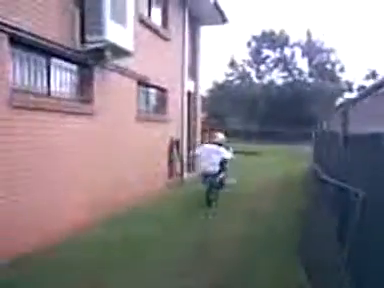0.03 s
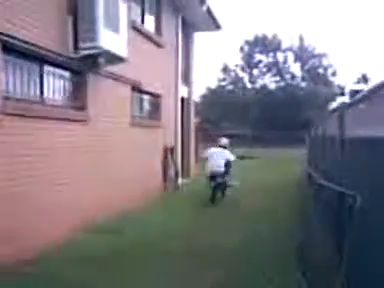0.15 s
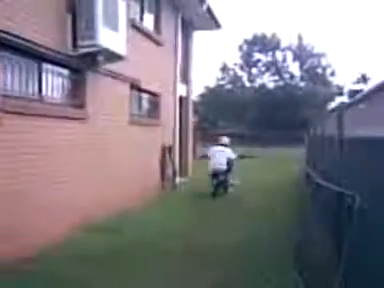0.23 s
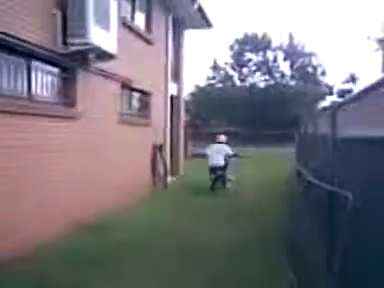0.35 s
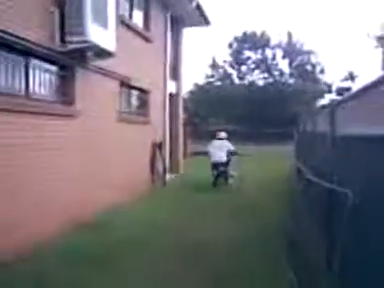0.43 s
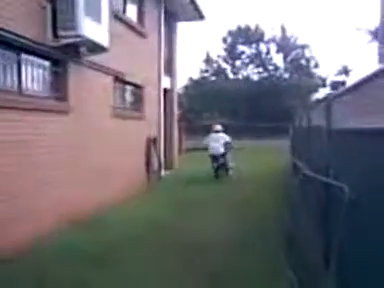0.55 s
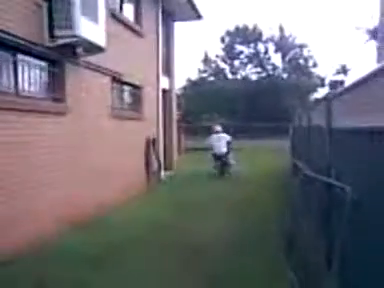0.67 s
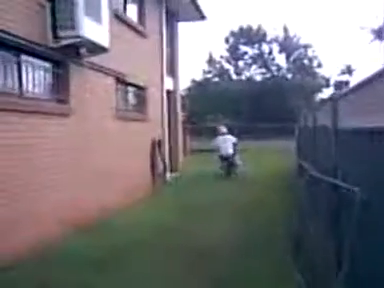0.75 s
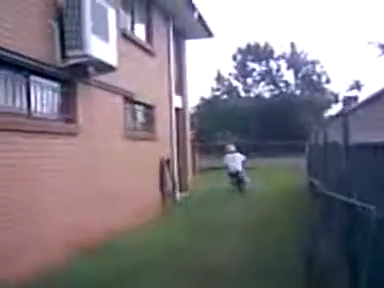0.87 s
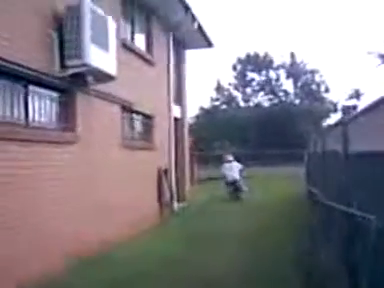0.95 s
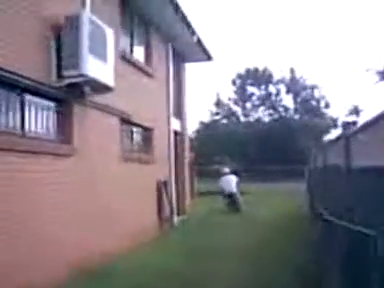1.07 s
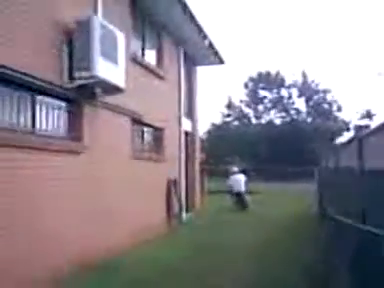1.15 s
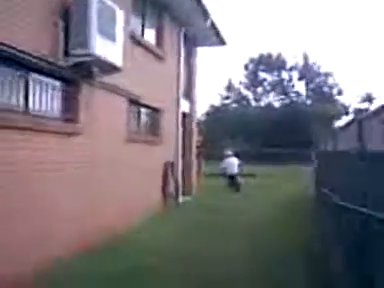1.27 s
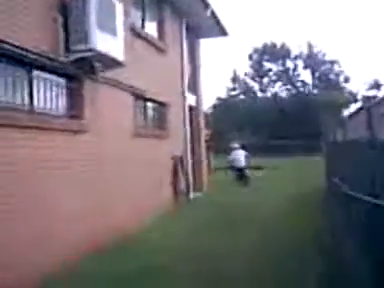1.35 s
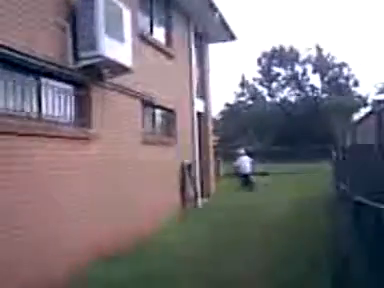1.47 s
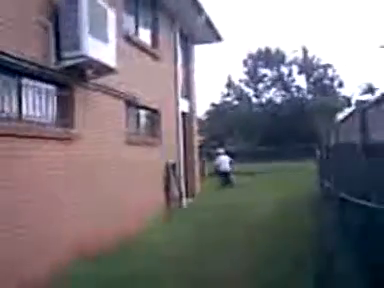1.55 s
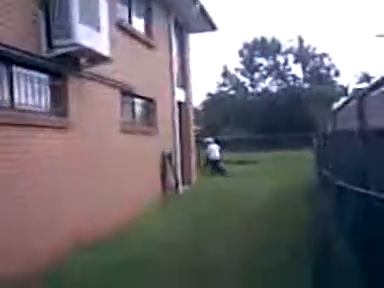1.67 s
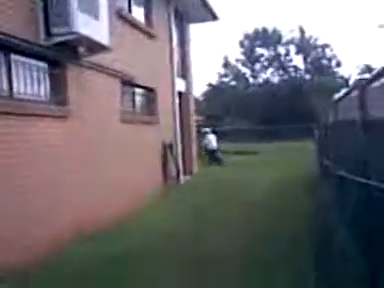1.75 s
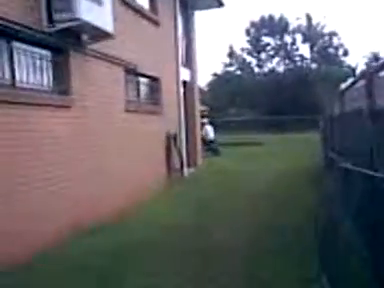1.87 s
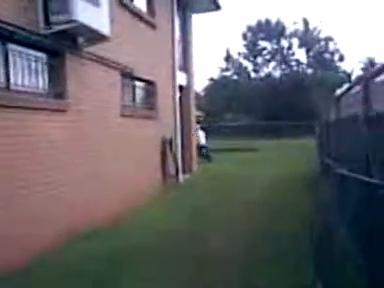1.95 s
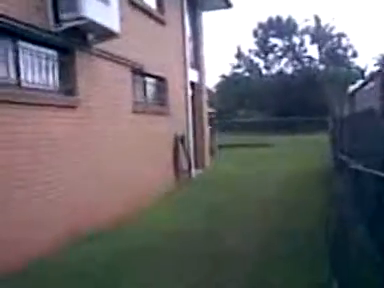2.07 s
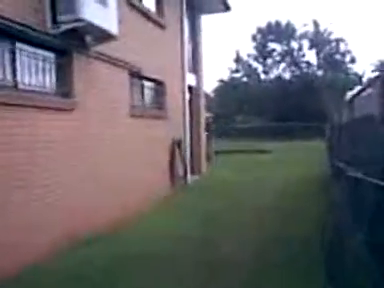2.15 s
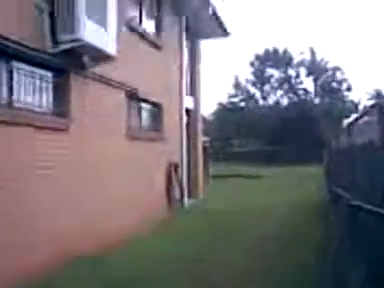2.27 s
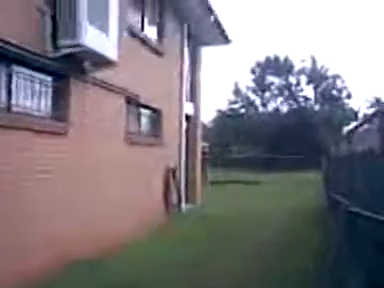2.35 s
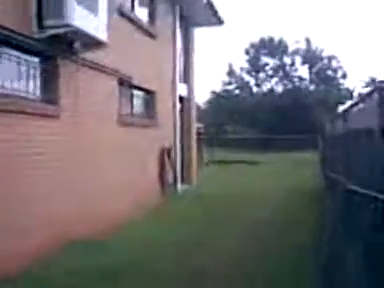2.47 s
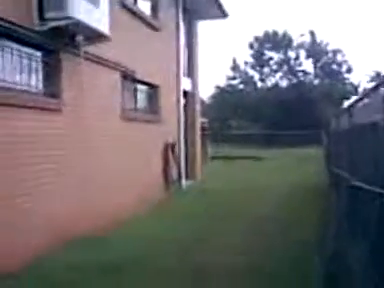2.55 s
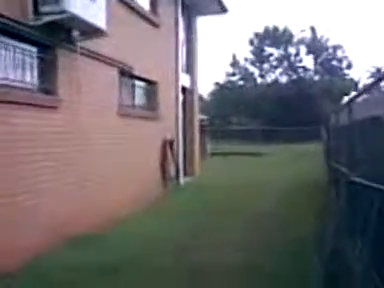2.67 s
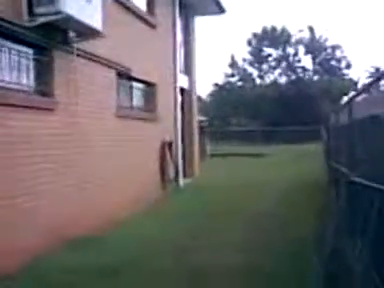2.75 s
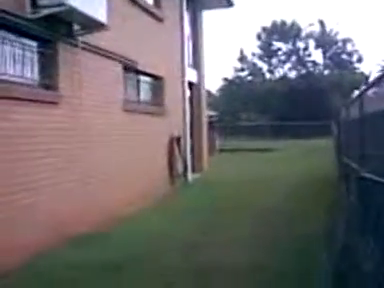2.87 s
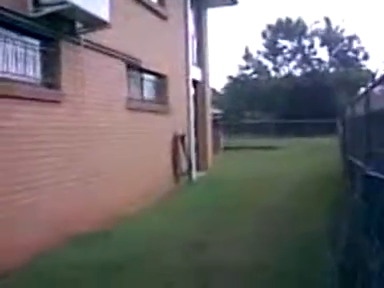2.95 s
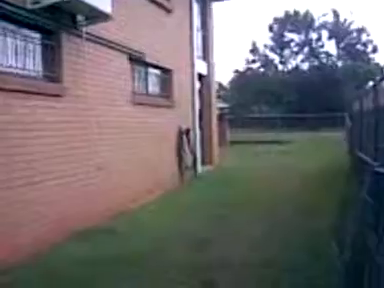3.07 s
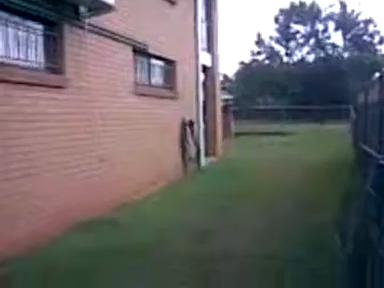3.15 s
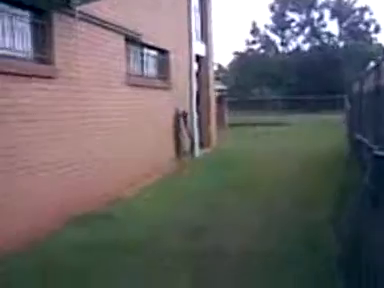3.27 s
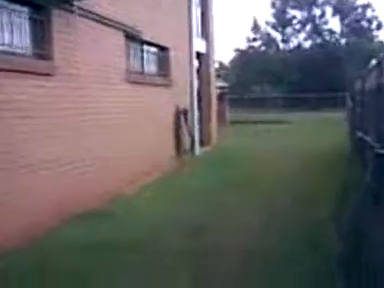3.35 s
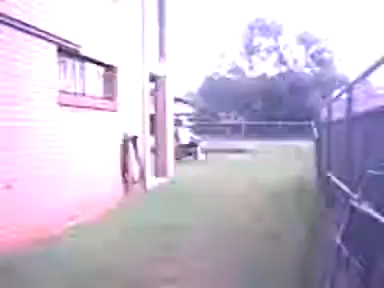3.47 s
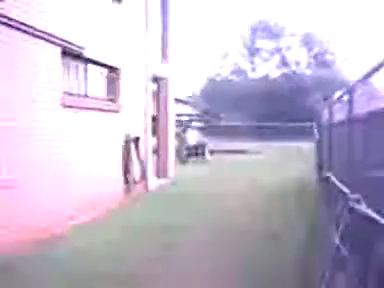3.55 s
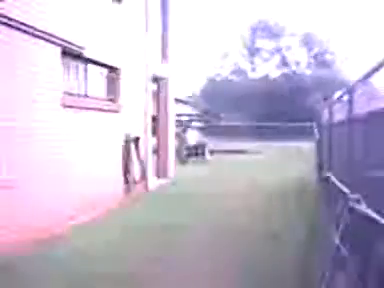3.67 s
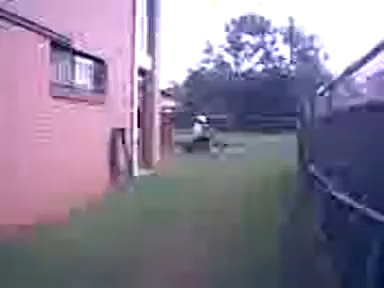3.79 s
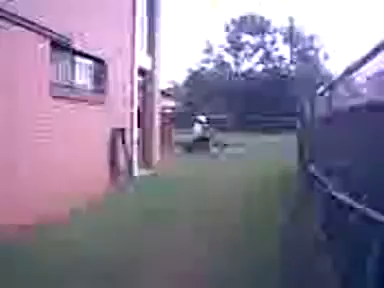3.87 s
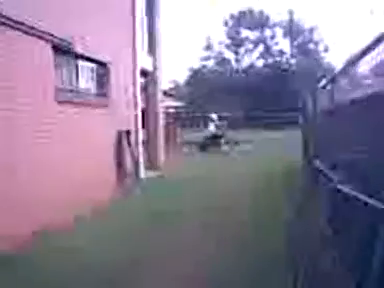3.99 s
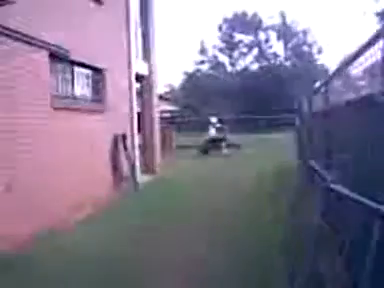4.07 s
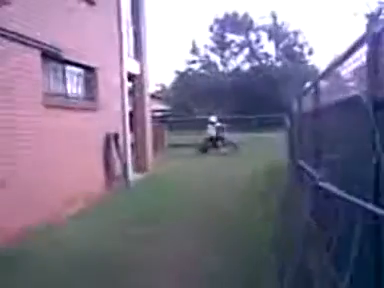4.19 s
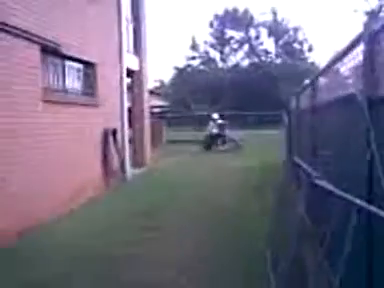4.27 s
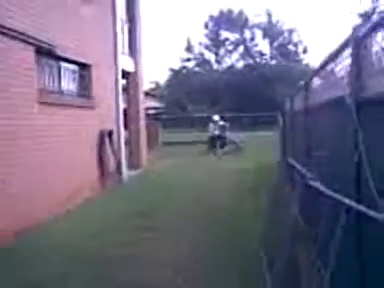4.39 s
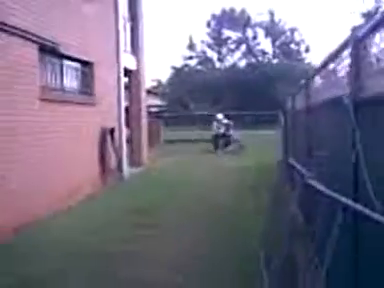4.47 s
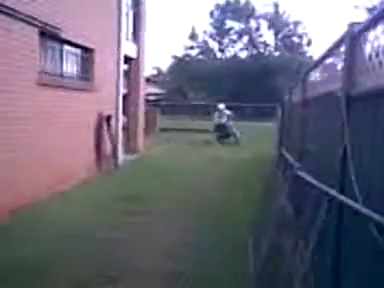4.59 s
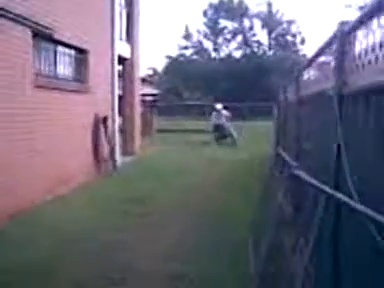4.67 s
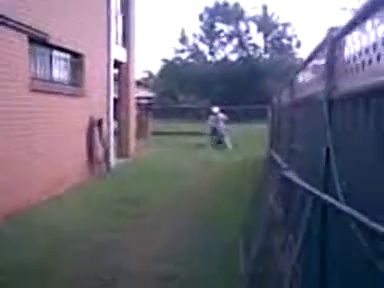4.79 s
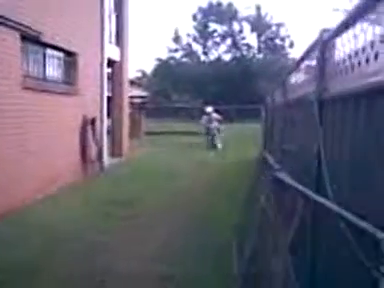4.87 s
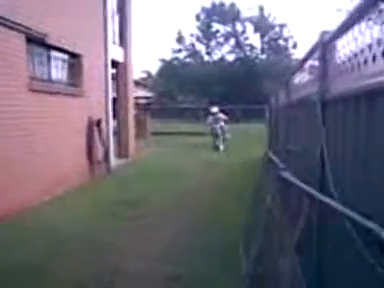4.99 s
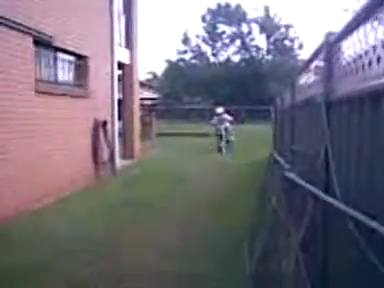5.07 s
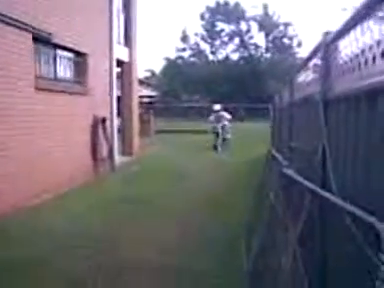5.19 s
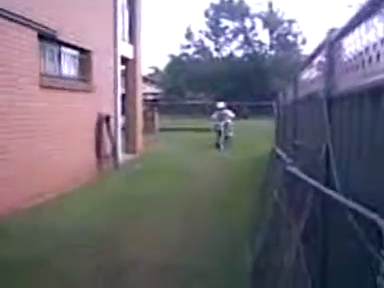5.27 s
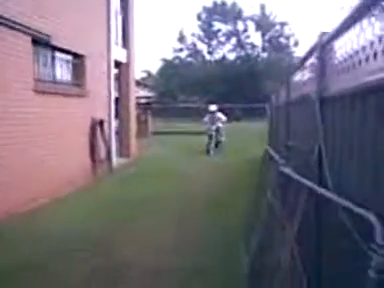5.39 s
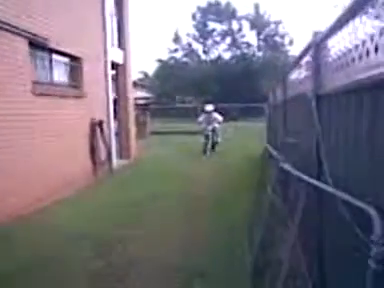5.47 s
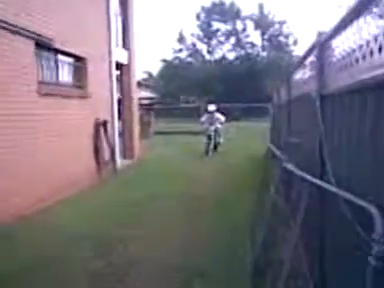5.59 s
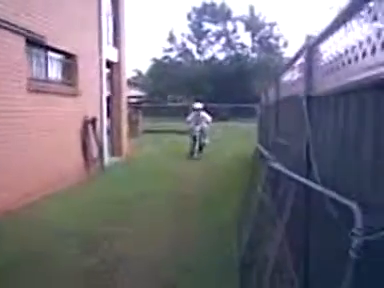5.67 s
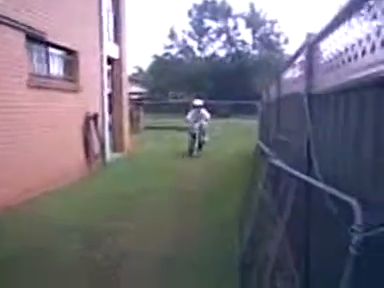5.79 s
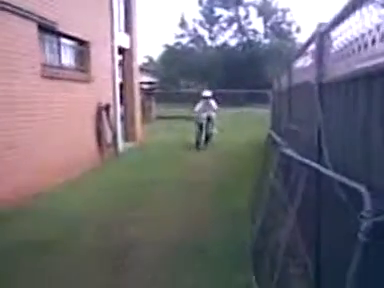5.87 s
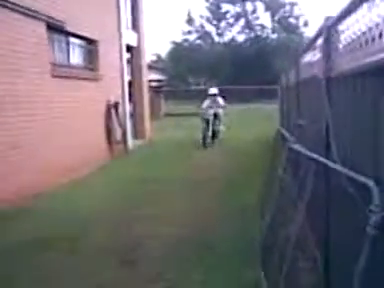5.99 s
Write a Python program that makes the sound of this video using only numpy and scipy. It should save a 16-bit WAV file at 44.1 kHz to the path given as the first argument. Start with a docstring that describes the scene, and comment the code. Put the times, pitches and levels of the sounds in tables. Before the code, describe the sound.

A small single-cylinder motorbike opens with a loud, clipped, raspy bark and briefly ringing metallic panels, falling off within about half a second. From 0.5 to 2 s its pitch sinks and it recedes as a low, boomy, fluttering putter, with a tiny misfire near 1.8 s and a few light clicks close by. By 2.5 to 3.4 s the engine is faint and slow, while sharper plastic handling clicks come forward. Around 3.4 to 3.55 s a dense, loud creaking rattle bursts from the camera case, followed by a dull palm bump at 3.75 s and more clicks around 4.25 s. The slow engine putters unevenly, stumbling near 4.6 s. From about 5.4 s it revs, rasp and ringing rising, surging abruptly loud and distorted by 6 s. The microphone is narrow, bass-light and faintly hissy.

```python
"""A small single-cylinder motorbike barks loudly, slows and fades as it rides off; later it is heard
faintly, then grows fast and loud again. Each firing excites harmonics in the exhaust pipe; flow noise, a
mechanical rasp and briefly singing panels join them, the last two swelling once a firing.
Close by, handling clicks on the plastic case of a small camera, with a creaking rattle near 3.5 s: decaying
modes and noise. Its narrow microphone channel clips on the loudest moments, and its electronics hiss faintly."""
import sys
import numpy as np
from scipy import signal
from scipy.fft import rfft, irfft, next_fast_len
from scipy.io import wavfile
from scipy.ndimage import uniform_filter1d, map_coordinates

SR = 44100
rng = np.random.default_rng(int(sys.argv[2]) if len(sys.argv) > 2 else 0)


def file_out(sig):
    """Save sig as 16-bit WAV at sys.argv[1]."""
    # one column per channel
    cols = np.atleast_2d(sig).T
    # limit, then scale
    lim = np.clip(cols, -1, 1)
    pcm = np.round(lim * 32767).astype(np.int16)
    wavfile.write(sys.argv[1], SR, pcm)


N = 266364


def amp(db):
    """Decibel law: the amplitude gain of a level in dB."""
    return 10 ** (np.asarray(db) / 20)


def unit(x):
    """Power normalization: x at rms 1."""
    return x / np.sqrt(np.mean(x ** 2) + 1e-20)


def curves(rows):
    """Linear interpolation in time: one value per sample for each column after the time."""
    s, *columns = np.transpose(rows)
    return [np.interp(np.arange(N) / SR, s, column) for column in columns]


def wobble(rate, size=N):
    """Band-limited random modulation: a smooth curve through random knots, rate knots a second."""
    knots = rng.standard_normal(int(size * rate / SR) + 4)
    return map_coordinates(knots, [np.arange(size) * rate / SR])


def filtered(x, response):
    """Linear filtering: the spectrum of x times a response of frequency in Hz."""
    m = next_fast_len(N + SR // 2)
    hz = np.fft.rfftfreq(m, 1 / SR)
    return irfft(rfft(x, m) * response(hz), m)[:N]


def rush(spectrum, patchy_db):
    """Spectral shaping: coloured noise of rms 1 whose time-frequency patches vary at random in gain."""
    z = signal.stft(rng.standard_normal(N), nperseg=512)[2]
    field = uniform_filter1d(rng.standard_normal(z.shape), size=3, axis=0)  # across frequency
    field = uniform_filter1d(field, size=6, axis=1)  # across time
    noise = signal.istft(z * amp(patchy_db * unit(field)), nperseg=512)[1][:N]
    f, db = np.transpose(spectrum)
    return unit(filtered(noise, lambda hz: amp(np.interp(np.log(hz + 1), np.log(f + 1), db))))


def ringing(turns, rate, centre_hz, width_hz, count, broken):
    """Resonance: firing harmonics weighted by three equal poles, each drifting a little; rms near 1."""
    wave, power, jitter = np.zeros(N), np.zeros(N), .04 * wobble(12)
    for k in range(1, count):
        off = 2 * (k * rate - centre_hz) / width_hz
        gain = (1 + off ** 2) ** -1.5 * amp(2.5 * broken * wobble(6 * broken))
        lag = 3 * np.arctan(off)
        drift = k * (jitter + .02 * wobble(9))
        wave += gain * np.cos(2 * np.pi * k * turns - lag + drift)
        power += gain ** 2 / 2
    return wave / np.sqrt(power)


def singing(rows, clear):
    """Narrow-band modulation: short sines smeared by complex noise, with a clear share left."""
    out = np.zeros(N + SR)
    for s, length, hz, width_hz, db in rows:
        t = np.arange(int(length * SR)) / SR
        fuzz = clear + wobble(width_hz, size=len(t)) + 1j * wobble(width_hz, size=len(t))
        tone = unit(np.imag(fuzz * np.exp(2j * np.pi * hz * t)))
        swell = np.sin(np.pi * t / length) ** 0.8
        out[round(s * SR):][:len(t)] += amp(db) * swell * tone
    return out[:N]


# Firing rate of the cylinder: time_s [s], rate_hz [firings/s]
FIRING_RATE = [(0.0, 53.0), (0.2, 45.9), (0.4, 43.8), (0.55, 39.6), (0.7, 41.3), (1.1, 38.3), (1.6, 31.2),
               (1.8, 32.0), (1.9, 30.9), (2.5, 30.0), (2.87, 25.4), (3.05, 27.1), (3.28, 22.2), (3.6, 24.1),
               (3.75, 26.4), (4.0, 24.8), (4.22, 22.5), (4.4, 23.3), (4.62, 21.9), (4.9, 24.5), (5.1, 24.6),
               (5.8, 28.9), (5.9, 31.8), (6.04, 39.4)]
# Firings that fail: time_s [s], gain_db [dB]
FAILED_FIRINGS = [(1.812, -16), (4.6, -9)]
MISFIRE_S = .013  # half width of each gap, where its dip in dB has fallen to 1/e


def firings():
    """Periodic excitation: rate, its integral in cycles, and the random strength of each firing."""
    rate, = curves(FIRING_RATE)
    turns = np.cumsum(rate) / SR + 0.3028
    strength = amp(rng.standard_normal(400)[turns.astype(int) % 400])  # no two firings alike
    t = np.arange(N) / SR
    gaps_db = sum(db * np.exp(-((t - s) / MISFIRE_S) ** 2) for s, db in FAILED_FIRINGS)
    strength = uniform_filter1d(strength, size=200) * amp(gaps_db)
    return rate, turns, strength


# Low pipe resonance, before firing strength: time_s [s], level_db [dB], centre_hz [Hz]
PIPE_BOOM = [(0, -41, 201), (.13, -22, 150), (.22, -18.5, 138), (.26, -34, 149), (.4, -33, 135),
             (.43, -20, 135), (.6, -14.5, 140), (.77, -23, 151), (.92, -18.5, 154), (1.3, -24, 149),
             (1.65, -21, 159), (1.9, -24, 168.7), (2.4, -31, 163.6), (2.9, -35.5, 137.7), (3.12, -33, 146),
             (3.5, -42.5, 137), (3.72, -37.5, 135), (3.8, -25.5, 135), (4.05, -28.5, 148.5),
             (4.28, -35.5, 153), (4.42, -32, 156), (4.6, -34.5, 160.6), (4.9, -28.5, 164.3),
             (5.25, -35, 160.5), (5.7, -28, 162.3), (5.86, -25, 169.8), (6.04, -24, 181)]
# Upper pipe resonance, before its trim and firing strength: time_s [s], level_db [dB], centre_hz [Hz]
PIPE_BARK = [(0, -0.5, 294.6), (.1, -17.5, 286), (.28, -13, 267.4), (.45, -21.5, 283), (.7, -27.5, 294),
             (.9, -25.5, 309), (1.1, -32.5, 332), (1.22, -40.5, 314), (1.5, -34, 272), (1.8, -36, 310),
             (2.4, -39, 307), (2.95, -51, 266), (3.1, -43.5, 258), (3.4, -45, 274), (3.75, -44.5, 260),
             (3.92, -32.5, 248), (4.1, -43, 259), (4.3, -35.5, 263), (4.65, -43, 281), (4.8, -35, 303),
             (5.3, -38.5, 306), (5.62, -44.5, 327), (5.82, -32.5, 377), (5.93, -27.5, 368), (6, -10.5, 390),
             (6.04, -12, 390)]
# Relative spectrum of the exhaust flow noise: frequency_hz [Hz], density_db [dB per Hz]
FLOW_SPECTRUM = [(15, -18), (35, -10.5), (60, -8), (90, -2), (130, 3.5), (190, -3), (240, -12), (320, -51)]


def exhaust(rate, turns, strength):
    """Pipe resonance: boom and bark select firing harmonics, and turbulent flow noise follows both levels."""
    (boom_db, boom_hz), (bark_db, bark_hz) = curves(PIPE_BOOM), curves(PIPE_BARK)
    boom = amp(boom_db) * ringing(turns, rate, boom_hz, width_hz=46.2, count=10, broken=0.99)
    bark = amp(bark_db - 2.5) * ringing(turns, rate, bark_hz, width_hz=130, count=22, broken=1.2)
    flow = (amp(boom_db - 13.5) + amp(bark_db - 16.5)) * rush(FLOW_SPECTRUM, patchy_db=4.5)
    return strength * (boom + bark + flow)


# Rasp levels before modulation: time_s [s], low_band_db [dB], high_band_db [dB]
RASP_LEVELS = [(0, -10, -9.5), (.05, -25, -17), (.12, -30.5, -26.5), (.33, -19, -25), (.5, -31.5, -27),
               (.62, -31, -26.5), (.75, -35.5, -31.5), (1.05, -39.5, -35.5), (1.4, -39, -36),
               (1.53, -34.5, -33.5), (1.72, -39.5, -38), (2.1, -44.5, -42), (2.3, -43, -40),
               (2.6, -50, -48.5), (3, -41.5, -45.5), (3.4, -52, -49), (3.72, -49, -47.5), (3.82, -42, -38),
               (4.05, -44, -41.5), (4.35, -41.5, -44.5), (4.5, -48.5, -46), (4.85, -44, -41.5),
               (5.1, -45.5, -45), (5.5, -37.5, -35.5), (5.75, -32, -28), (5.9, -20.5, -23), (6, -10, -17.5),
               (6.04, -6.5, -21.5)]
# Hiss relative to the high rasp, strong while the tail pipe points this way: time_s [s], level_db [dB]
HISS_LEVEL = [(0, -11), (.12, -1.5), (.6, -3.5), (.9, -8), (1.4, -11), (2.6, -7.5), (3.7, -8), (4.3, -2),
              (5.1, -11), (6.04, -10)]
# Relative spectra of low rasp, high rasp and hiss, each: frequency_hz [Hz], density_db [dB per Hz]
LOW_SPECTRUM = [(180, -65), (260, 4), (330, 4.5), (450, 1.5), (600, -3), (800, -2.5), (1100, -4),
                (1300, -33), (1700, -70)]
HIGH_SPECTRUM = [(590, -34.5), (1000, -4), (1060, -10.5), (1120, -0.5), (1220, -0.5), (1370, 2.5),
                 (1530, 0.5), (1870, 5), (2040, 1), (2700, -14.5), (3510, -47), (5940, -120)]
HISS_SPECTRUM = [(1470, -27.5), (2500, -0.5), (2870, -3), (3470, 0), (3990, -14), (4420, -16), (4700, -14),
                 (6110, -49.5), (10300, -120)]


def mechanical_rasp(beat):
    """Amplitude modulation: three noise bands swell with each firing under a fast random crackle."""
    low_db, high_db = curves(RASP_LEVELS)
    hiss_db = high_db + curves(HISS_LEVEL)[0]
    rasp = amp(low_db) * rush(LOW_SPECTRUM, patchy_db=2.5)
    rasp += amp(high_db) * rush(HIGH_SPECTRUM, patchy_db=3.0)
    rasp += amp(hiss_db) * rush(HISS_SPECTRUM, patchy_db=3.0)
    return rasp * amp(0.8 * beat + 0.8 * wobble(16) + 1.2 * wobble(180))


# Panels of the bike shaken into brief resonance; level before firing modulation and trim:
# start_s [s], length_s [s], pitch_hz [Hz], smear_rate [noise knots/s], level_db [dB]
PANEL_TONES = [(.015, 0.057, 1374, 122, -9.5), (.105, 0.063, 1339, 108, -12.5),
               (.01, 0.046, 1950, 197, -10), (.16, 0.16, 1347, 220, -22.5), (.3, 0.13, 1630, 291, -18),
               (.55, 0.25, 1150, 38, -33), (1.59, 0.041, 1876, 108, -31), (1.96, 0.13, 1895, 149, -38),
               (2.2, 0.054, 1665, 109, -32), (5.18, 0.57, 947, 60, -37), (5.4, 0.24, 981, 70, -29.5),
               (5.47, 0.12, 998, 71, -24.5), (5.56, 0.12, 1994, 85.6, -26), (5.74, 0.093, 1027, 31, -29.5),
               (5.64, 0.41, 1760, 63, -24.5), (5.81, 0.06, 1710, 81.4, -14.5),
               (5.905, 0.02, 3670, 101, -20.5), (6, 0.049, 1760, 57.5, -16)]


def panels(beat):
    """Forced vibration: brief panel resonances swell and sink once a firing."""
    return amp(3.1 * beat - 4.0) * singing(PANEL_TONES, clear=0.71)


def engine():
    """Common excitation: one firing cycle drives the exhaust, the rasp and the panels."""
    rate, turns, strength = firings()
    beat = np.cos(2 * np.pi * (turns - .2))
    return exhaust(rate, turns, strength) + mechanical_rasp(beat) + panels(beat)


# Handling clicks on the case, with a creaking rattle near 3.5 s;
# levels before the trims below, edge and rattle relative to the body:
# start_s [s], level_db [dB], pitch_hz [Hz], swell_ms [ms to the envelope's peak], edge_db [dB], rattle_db [dB]
CASE_CLICKS = [(1.449, -18.5, 1110, 2.1, -40, -30), (1.57, -8, 1040, 0.93, -20.5, -10),
               (2.19, -14.5, 1270, 0.56, -33, 1.5), (2.659, -24, 894, 2.2, -5, -19.5),
               (2.668, -16, 1550, 0.8, 12.5, -13), (2.818, -13, 488, 1.56, -22, -10.5),
               (2.921, -3, 696, 1.25, -34, -8), (2.93, -4, 690, 1.9, -45, -7),
               (3.051, -5, 723, 2.4, -50, -13), (3.234, -2, 518, 1.26, -34, -19),
               (3.423, -6, 770, 1.4, 0.5, -4.5), (3.454, -3.5, 520, 3, -26, -28),
               (3.464, -8, 575, 2.9, -24, -37), (3.474, 4.5, 700, 0.73, -22, -22),
               (3.479, -1, 595, 1.2, -20, -17), (3.484, -0.5, 700, 1.05, -17, -31),
               (3.49, 6.5, 890, .43, -26, -15), (3.499, 4.5, 1052, 1.4, -25.5, -11),
               (3.508, -2, 630, 1.7, -17, -20), (3.515, 1.5, 453, 1.2, -27, -44),
               (3.519, -8.5, 433, 2.4, -19, -14.5), (3.535, -3.5, 454, 2.2, -15, -8),
               (3.755, -9.5, 433, 4.2, -12, -6), (3.86, -29, 1190, 1.6, -14, -10),
               (4.104, -32, 400, 1.8, -9, -23), (4.244, -2.5, 1320, 1.2, -15, -10),
               (4.251, -0.5, 1270, 0.76, -37, -42), (4.3, -11, 590, 1.9, -15, -26),
               (4.322, -9, 522, 1.2, -15, -27), (4.345, -20, 480, 2, -11, -17),
               (4.787, -15, 614, 1.6, -21, -20), (5.194, -27.5, 570, 1.6, -12, 0.5),
               (5.737, -13, 477, 2.4, -16, -2)]
SIDE_MODES_DB = -16  # each mode of the case beside its body tone


def clicks():
    """Impact response: a few cycles of falling pitch in the case, a sharp noise edge and a decaying rattle."""
    out, t = np.zeros(N + SR), np.arange(SR // 8) / SR
    edge_band = signal.butter(4, [1500, 3700], "band", fs=SR, output="sos")
    rattle_band = signal.butter(4, [400, 1700], "band", fs=SR, output="sos")
    for s, db, hz, swell_ms, edge_db, rattle_db in CASE_CLICKS:
        noise = rng.standard_normal((2, len(t)))
        u = 1000 * t / swell_ms
        swell = (u * np.exp(1 - u)) ** 1.4
        # the pitch starts a third high and sags to its final value
        phase = 2 * np.pi * hz * (t + 0.00023 * (1 - np.exp(-t / 0.00068)))
        side_modes = np.sin(.55 * phase) + np.sin(1.65 * phase) + np.sin(2.216 * phase)
        body = np.sin(phase) + amp(SIDE_MODES_DB) * side_modes
        edge = amp(edge_db + 5) * signal.sosfilt(edge_band, noise[0])
        decay = amp(rattle_db + 11.5 - 60 * t / 0.068)  # 60 dB in 68 ms
        rattle = decay * (1 - np.exp(-u)) * signal.sosfilt(rattle_band, noise[1])
        out[round(s * SR):][:len(t)] += amp(db - 3.0) * (swell * (body + edge) + rattle)
    return out[:N]


# A palm bumps the case: start_s [s], level_db [dB], pitch_hz [Hz], length_s [s]
PALM_THUMP = (3.754, 3.4, 146.4, 0.019)


def thump():
    """Low-frequency impact: a palm bump as a short sine of inverted polarity under a skewed arch."""
    out = np.zeros(N)
    s, db, hz, length = PALM_THUMP
    t = np.arange(int(length * SR)) / SR
    arch = np.sin(np.pi * (t / length) ** .7)
    out[round(s * SR):][:len(t)] -= amp(db) * arch * np.sin(2 * np.pi * hz * t)
    return out


# Short noise bands and blurred rings, some alongside the clicks:
# start_s [s], length_s [s], pitch_hz [Hz], smear_rate [noise knots/s], level_db [dB]
BLURRED_BANDS = [(2.67, 0.057, 3140, 1550, -37.5), (2.82, 0.05, 1200, 710, -42),
                 (2.93, 0.041, 654, 116, -24.5), (3.055, .05, 984, 746, -39), (3.24, .04, 790, 492, -39.5),
                 (3.418, 0.01, 930, 510, -21), (3.46, 0.072, 2816, 1200, -35), (3.43, 0.04, 2260, 396, -38),
                 (3.605, 0.072, 906, 292, -35), (3.76, 0.027, 2000, 1250, -27.5),
                 (3.98, 0.057, 3560, 590, -40.5), (4.18, 0.06, 3280, 203, -37.5),
                 (4.18, 0.068, 2250, 504, -40), (4.243, 0.0168, 466, 103, -15.5),
                 (4.63, 0.11, 604, 410, -34), (4.76, 0.057, 632, 313, -28.5)]


def blurred_bands():
    """Random modulation of a carrier: short noise bands, from broad hiss to blurred ringing."""
    return singing(BLURRED_BANDS, clear=0)


def scene():
    """Superposition: the bike and the handling of the camera."""
    return (engine() + clicks() + thump() + blurred_bands())[None]


MIC_HZ, TOP_HZ = 4950, 10450  # upper limits before and after clipping, in Hz
INPUT_HISS_DB = -83  # white noise of the camera's own electronics, before the upper limit


def record(dry):
    """Nonlinear distortion: clipping a narrow, bass-weak channel splatters above its band."""
    edge = lambda hz, top_hz: np.clip((top_hz - hz) / 400, 0, 1) ** 2
    heard = filtered(dry[0], lambda hz: edge(hz, MIC_HZ) * 1j * hz / (70 + 1j * hz))
    clipped = np.clip(heard, -1, 1) + amp(INPUT_HISS_DB) * rng.standard_normal(N)
    return np.clip(filtered(clipped, lambda hz: edge(hz, TOP_HZ)), -1, 1)[None]


dry = scene()
out = record(dry)
file_out(out)
```